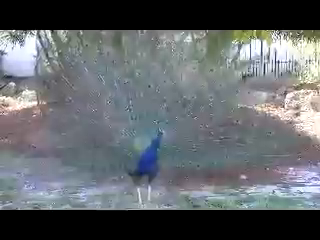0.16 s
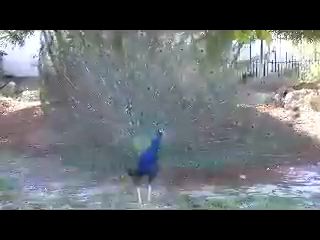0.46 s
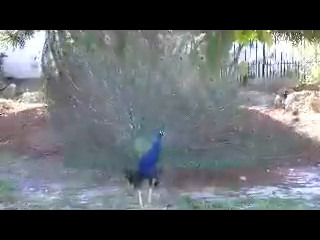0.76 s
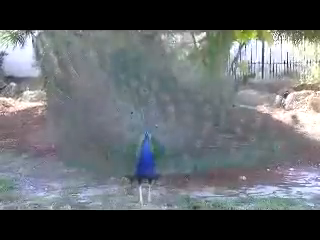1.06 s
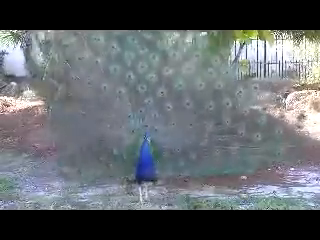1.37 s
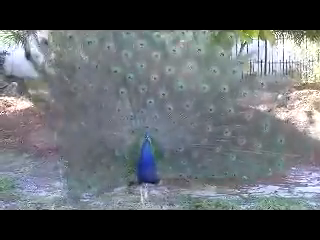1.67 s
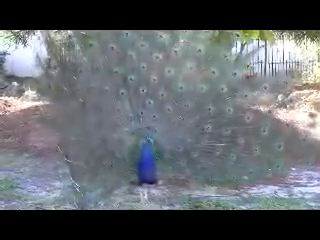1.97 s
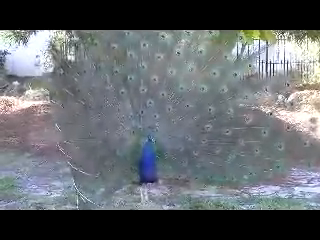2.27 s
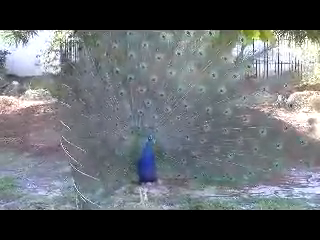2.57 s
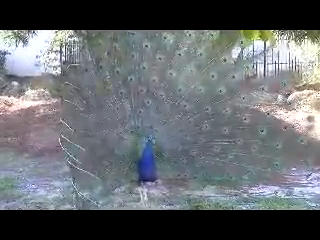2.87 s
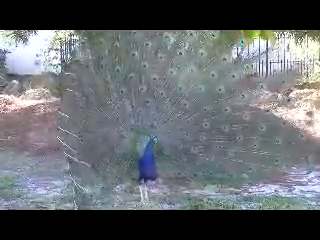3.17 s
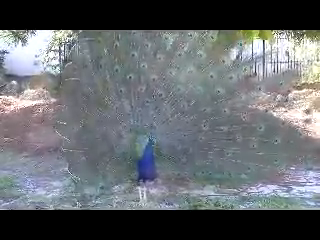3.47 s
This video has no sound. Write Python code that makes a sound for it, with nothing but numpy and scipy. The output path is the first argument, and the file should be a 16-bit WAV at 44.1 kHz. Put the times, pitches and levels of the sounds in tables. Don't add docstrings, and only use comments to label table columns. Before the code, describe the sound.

Dry feather rustling with quick quill clacks swells and fades outdoors above faint traffic and hiss.

```python
import sys
import numpy as np
from scipy import signal
from scipy.fft import rfft, irfft, next_fast_len
from scipy.io import wavfile
from scipy.ndimage import uniform_filter1d, map_coordinates

SR = 44100
rng = np.random.default_rng(int(sys.argv[2]) if len(sys.argv) > 2 else 0)


def elevation(decibels):
    levels = np.asarray(decibels, float)
    return 10 ** (levels / 20)


def transcribe(signal):
    frames = np.atleast_2d(signal).T
    limited = np.clip(frames, -1, 1)
    pcm = np.round(limited * 32767).astype(np.int16)
    wavfile.write(sys.argv[1], SR, pcm)


N = 159642


def unit(x):
    return x / np.sqrt(np.mean(x ** 2) + 1e-20)


def along(points, hz):
    point_hz, value = np.transpose(points)
    return np.interp(np.log(hz + 1), np.log(point_hz + 1), value)


def wobble(rate):
    knots = rng.standard_normal(int(N * rate / SR) + 4)
    return map_coordinates(knots, [np.arange(N) * rate / SR])


def filtered(x, response):
    m = next_fast_len(N + 8192)
    hz = np.fft.rfftfreq(m, 1 / SR)
    return irfft(rfft(x, m) * response(hz), m)[..., :N]


# frequency in Hz, left-right likeness (1 = the same).
LIKENESS = [(40, 0.94), (150, 0.99), (400, 0.83), (1150, 0.81), (1380, 0.93), (1700, 0.75), (4000, 0.57)]


def wide(spectrum_db):
    def mid_side(hz):
        angle = np.arccos(np.clip(along(LIKENESS, hz), -1, 1)) / 2
        return elevation(spectrum_db(hz)) * [np.cos(angle), np.sin(angle)]

    mid, side = filtered(rng.standard_normal((2, N)), mid_side)
    return unit(np.array([mid + side, mid - side]))


# frequency in Hz, density in dB per Hz.
TRAFFIC_COLOUR = [(12, -45), (20, -11), (43, -20), (112, -6.5), (282, -0.5), (629, -5.5), (1290, -7),
                  (1370, -5.5), (2700, -22.5), (3510, -38), (5940, -120)]
# centre in Hz, width in Hz, lift in dB.
DRONE_HUMPS = [(494, 43, 2.5), (640, 77, -4.5), (964, 55, 5), (1143, 90, -2.5), (1380, 107, 5),
               (2097, 300, 6.5)]
# frequency in Hz, left over right in dB.
DRONE_LEAN = [(60, 1), (130, -.7), (350, -1.5), (500, 0)]


def traffic():
    def colour_db(hz):
        humps = sum(db / (1 + ((hz - centre) / width * 2) ** 2) for centre, width, db in DRONE_HUMPS)
        return along(TRAFFIC_COLOUR, hz) + humps

    level_db = -39.5 + 0.13 * wobble(1.42) + 0.85 * wobble(7.62)
    drone = filtered(wide(colour_db), lambda hz: elevation(along(DRONE_LEAN, hz) * [[0.5], [-0.5]]))
    return elevation(level_db) * drone


MACHINE_HZ = [495, 1227, 1355, 1402]
MACHINE_DB = [-60.5, -63.5, -56, -55.5]


def hum():
    t = np.arange(N) / SR
    tones = 0
    for hz, db in zip(MACHINE_HZ, MACHINE_DB):
        level = np.sqrt(2) * elevation(db + 2.9 * wobble(8.1))
        tones = tones + level * np.sin(2 * np.pi * hz * t + 1.0 * wobble(11))
    return tones


# frequency in Hz, density in dB per Hz.
HISS_COLOUR = [(1530, -19.5), (2600, -2), (3410, -2), (6370, -5.5), (8080, -3), (8700, -6.5), (11400, -11),
               (13300, -34)]


def hiss():
    return elevation(-53) * wide(lambda hz: along(HISS_COLOUR, hz))


# multiple of the turning rate, level in dB rms.
STRONG_LINES = [(51, -74), (52, -70), (56, -72), (126, -78), (128, -73), (133, -67), (134, -71), (135, -73),
                (136, -76), (139, -75), (141, -76), (142, -75), (143, -75), (175, -78)]
# frequency in Hz, level in dB rms.
FAINT_LINES = [(2000, -105), (3000, -82.5), (6500, -85), (8000, -75.5), (9500, -82), (11300, -82.5),
               (12500, -82)]


def motor():
    turns_hz, spread_db = 58.41, 1.5
    t = np.arange(N) / SR
    order = np.arange(35, 220)
    level_db = along(FAINT_LINES, order * turns_hz) + spread_db * rng.standard_normal(len(order))
    for multiple, db in STRONG_LINES:
        level_db[order == round(multiple)] = db
    u = np.arange(4096) / 4096
    phase = order[:, None] * u + rng.random((len(order), 1))
    one_turn = elevation(level_db) @ np.sin(2 * np.pi * phase)
    position = (turns_hz * t + 0.00075 * wobble(5)) % 1
    lines = np.sqrt(2) * map_coordinates(one_turn, [position * len(u)], mode="grid-wrap")
    return lines * elevation(1.2 * wobble(3.4))


# frequency in Hz, density in dB per Hz.
FEATHER_COLOUR = [(1470, -19.5), (2500, -12), (2950, -7), (6350, -7.5), (6900, -1.5), (8740, -3),
                  (10500, -10.5), (13300, -21.5)]
# start in seconds, peak in dB, dull knock relative to it in dB, ring in Hz.
QUILL_CLACKS = [(1.214, -21.5, -19, 6820), (1.2384, -30, -18, 7350), (1.2436, -24, -16, 8530),
                (1.2514, -15.5, -13, 7500), (1.2584, -25, -16, 7330), (1.2845, -28, -17, 6850),
                (1.3044, -29, -2, 8260), (1.3084, -27, -11, 8800), (1.3364, -22, -23, 8300),
                (1.3451, -19, -10, 7620), (1.356, -24, -11, 8650), (1.4037, -23.5, -10, 8460),
                (1.4301, -34, -4, 7120), (1.436, -27, -7, 7250), (1.483, -36, -15, 8350),
                (1.4914, -38, -12.5, 7250), (1.517, -36, -14.5, 8650), (1.5628, -28, -20, 8700),
                (1.606, -21, -18, 7240), (1.6084, -31, -15, 8600), (1.6151, -18.5, -12.5, 7600),
                (1.705, -30.5, -15, 7250), (1.7104, -32, -2.5, 7440), (1.715, -32, -16, 7600),
                (1.802, -21.5, -26, 8760), (2.053, -47, -13.5, 8700), (2.0662, -29.5, -23, 8000),
                (2.1128, -22, -15, 7370), (2.137, -36, -25, 7370), (2.1444, -38, -21, 7600)]


def clacks():
    rise_s, hold_s, fall_s = 0.00085, 0.0022, 0.0014
    t = np.arange(SR // 100) / SR
    rise = 1 - np.exp(-(t / rise_s) ** 2)
    fall = 1 + np.exp(np.minimum((t - hold_s - rise_s) / fall_s * 2, 50))
    shape = rise / fall
    noise = rng.standard_normal((len(QUILL_CLACKS), 3, len(t)))
    energy = np.sum((noise * shape) ** 2, axis=2, keepdims=True)
    noise = noise / np.sqrt(energy / np.sum(shape ** 2))
    bright, dull, ring = np.zeros((3, N))
    for (s, db, low_db, hz), (scrape, knock, drift) in zip(QUILL_CLACKS, noise):
        at = slice(round(s * SR), round(s * SR) + len(t))
        bright[at] += elevation(db) * shape * scrape
        dull[at] += elevation(db + low_db + 9.5) * shape * knock
        ring[at] += elevation(db - 2) * shape * np.sin(2 * np.pi * hz * t + 0.11 * np.cumsum(drift))

    def bright_response(hz):
        return elevation(along(FEATHER_COLOUR, hz) + 8.5) / (1 + (5500 / (hz + 1)) ** 8)

    def dull_response(hz):
        return elevation(along(FEATHER_COLOUR, hz) + 10.5) / (1 + (hz / 6000) ** 8)

    return elevation(-7) * (ring + filtered(bright, bright_response) + filtered(dull, dull_response))


# time in seconds, level of the steady rustle in dB.
SHAKE_EFFORT = [(.68, -77), (.77, -63), (.85, -60), (.93, -52), (1.0, -50.5), (1.25, -44.5), (1.5, -44),
                (1.7, -47), (2.1, -51), (2.18, -56), (2.5, -59.5), (3.1, -82)]
SWING_MIDDLE_S = [.772, .948, .998, 1.046, 1.112, 1.152, 1.204, 1.252, 1.308, 1.348, 1.432, 1.489, 1.524,
                  1.61, 1.712, 1.855, 1.963, 2.052, 2.14]
# level in dB, half length in seconds.
SWING_SHAPES = [(-52, 0.021), (-46.5, .013), (-45.5, .011), (-44.5, 0.013), (-50, 0.009), (-42, 0.012),
                (-41, 0.0059), (-35.5, .013), (-38, .006), (-38, .012), (-36.5, 0.011), (-43.5, 0.0077),
                (-42, .01), (-39, 0.0094), (-43, .008), (-43.5, .012), (-46, 0.0092), (-48, 0.014),
                (-40.5, 0.0074)]


def rustle():
    ticks_per_s, tick_spread_db, brush_share = 5000, 4, 0.71
    t = np.arange(N) / SR
    s, level_db = np.transpose(SHAKE_EFFORT)
    bed = elevation(np.interp(t, s, level_db, -120, -120) + 0.7 * wobble(60))
    swing_power = 0
    for middle, (db, half) in zip(SWING_MIDDLE_S, SWING_SHAPES):
        swing_power = swing_power + elevation(db) ** 2 * np.exp(-((t - middle) / half) ** 2)
    swing = np.sqrt(swing_power)

    hit = rng.random((2, N)) < ticks_per_s / SR
    sign = np.sign(rng.standard_normal((2, N)))
    size = np.minimum(rng.exponential(size=(2, N)), 3.5)
    ticks = unit(hit * sign * elevation(tick_spread_db * size))
    brushing = rng.standard_normal((2, N))
    contact = np.sqrt(brush_share) * brushing + np.sqrt(1 - brush_share) * ticks

    low_db = np.array([[2.5], [-1.5]])

    def colour(hz):
        return elevation(along(FEATHER_COLOUR, hz) + low_db / (1 + (hz / 5400) ** 8))

    bed_noise, swing_noise = unit(filtered(contact, colour))
    return (bed_noise * bed + swing_noise * swing) * elevation(1.3 * wobble(170))


def scene():
    return traffic() + hum() + hiss() + motor() + clacks() + rustle()


def strong(z, floor_db):
    power = np.abs(z) ** 2
    return power > elevation(floor_db) ** 2 * uniform_filter1d(power, size=16, axis=0)


# frequency in Hz, margin in units of chance.
MID_MARGIN = [(2380, 9), (2440, 3.9), (2600, 3.9), (2660, 5.5), (10500, 5.5), (11350, 3), (11450, -.6),
              (12400, -1.8), (13100, -5), (13200, -20)]
# frequency in Hz, margin in units of chance.
SIDE_MARGIN = [(100, 0), (300, 3), (1500, 2), (2000, 1), (2700, 2.5), (3900, -.5), (4100, -3), (14000, -5)]
# frequency in Hz, dB against neighbours.
MID_FLOOR = [(3000, -18.5), (9500, -5), (10600, 3), (11300, 2), (11600, 2.5)]


def starved(x):
    starve_per_db, recover_s, band_hz = 0.3, 0.55, 130
    mid_side = [x[0] + x[1], x[0] - x[1]]
    hz, t, (mid, side) = signal.stft(mid_side, SR, window="cosine", nperseg=2048, boundary="zeros")
    treble_db = 10 * np.log10(np.sum(np.abs(mid[hz > 3000]) ** 2, axis=0) + 1e-12)
    busy_db = np.maximum(treble_db - np.median(treble_db), 0)
    hold = np.exp(-t[1] / recover_s)
    lasting_db = signal.lfilter([1 - hold], [1, -hold], busy_db)
    shortage = starve_per_db * (0.55 * busy_db + lasting_db)

    chance = unit(uniform_filter1d(rng.standard_normal((2, len(hz), len(t))), size=3, axis=2))
    chance = chance[:, (hz // band_hz).astype(int)]
    lift = np.where(hz[:, None] > 11000, 0.48 * starve_per_db * busy_db, -0.17 * busy_db)
    mid_kept = along(MID_MARGIN, hz)[:, None] + lift + chance[0] > 0
    side_kept = along(SIDE_MARGIN, hz)[:, None] - shortage + chance[1] > 0
    mid = mid * mid_kept * strong(mid, along(MID_FLOOR, hz)[:, None] - 0.69 * busy_db)
    side = side * side_kept * strong(side, -0.5)
    left_right = np.array([mid + side, mid - side]) / 2
    return signal.istft(left_right, SR, window="cosine", nperseg=2048)[1][:, :N]


def low_pass(x):
    return signal.sosfilt(signal.butter(12, 13100, fs=SR, output="sos"), x)


def record(dry):
    return low_pass(starved(dry))


dry = scene()
out = record(dry)
transcribe(out)
```